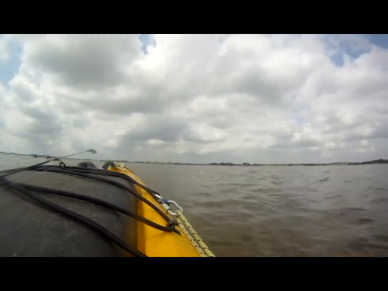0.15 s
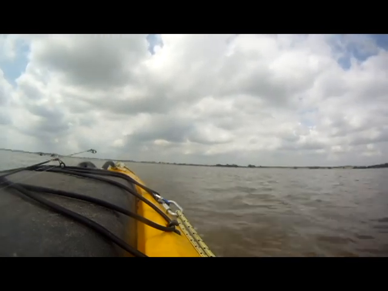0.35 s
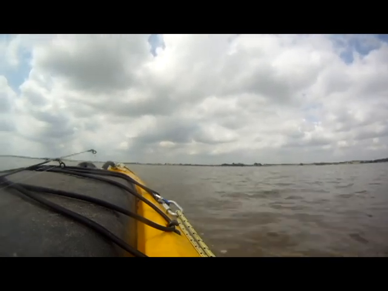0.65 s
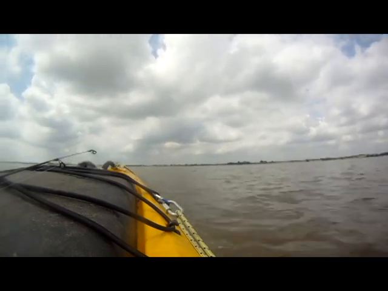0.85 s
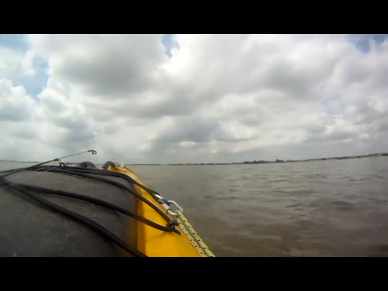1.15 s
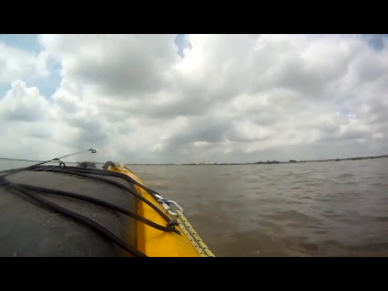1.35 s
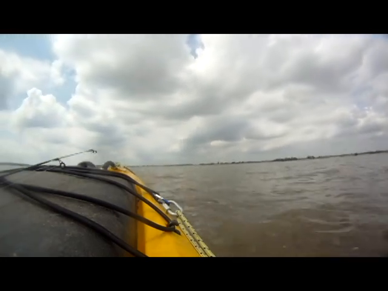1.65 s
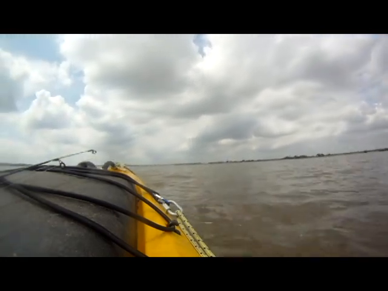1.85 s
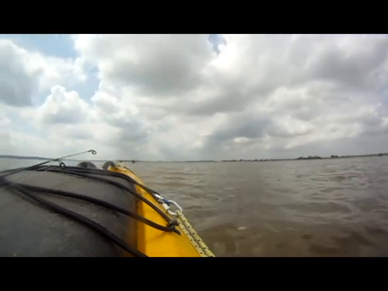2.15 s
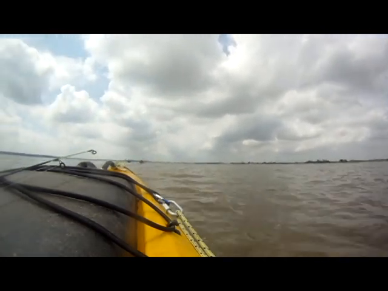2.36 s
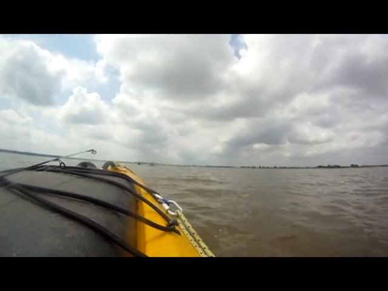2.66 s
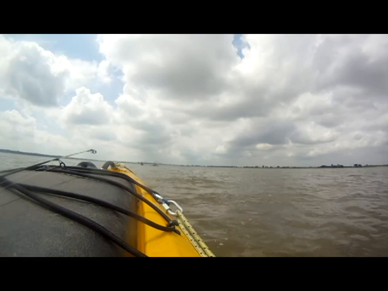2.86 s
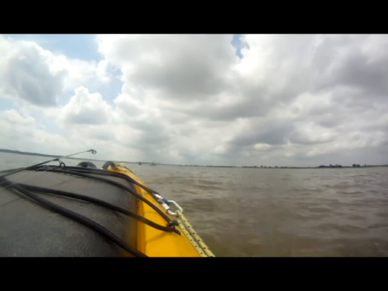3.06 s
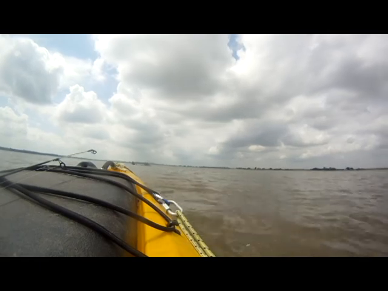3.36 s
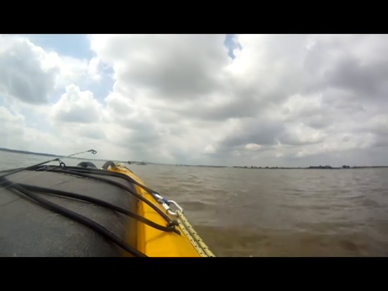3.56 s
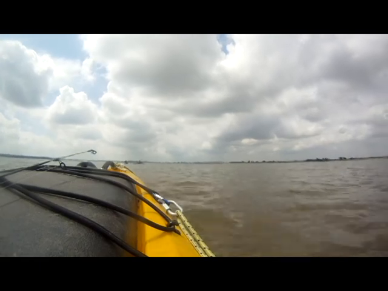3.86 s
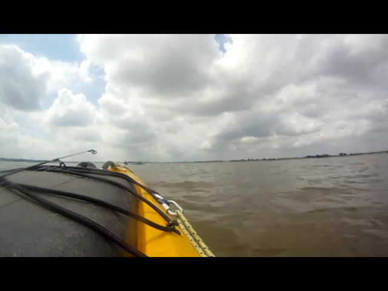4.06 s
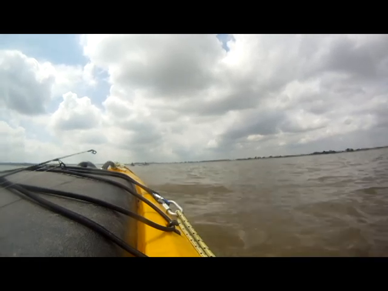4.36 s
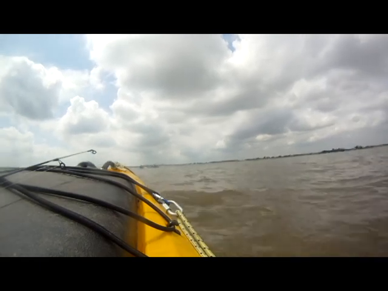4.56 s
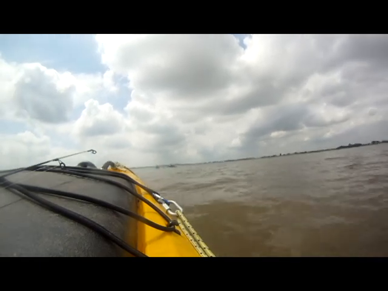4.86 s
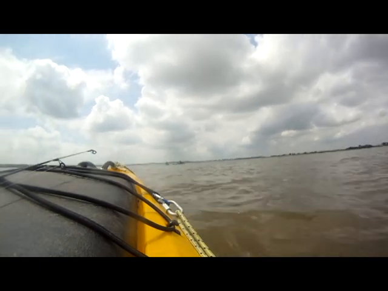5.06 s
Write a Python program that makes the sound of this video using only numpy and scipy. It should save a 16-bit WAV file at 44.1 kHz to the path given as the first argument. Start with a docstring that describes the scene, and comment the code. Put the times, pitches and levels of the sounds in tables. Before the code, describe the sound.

Close on a kayak deck on open water, small waves slap the hollow plastic hull at irregular intervals. Light plops lead to a strong splash just after one second with a deep soft boom, then more bubbly slaps around 1.6, 2, 3 and 5 seconds. Drops tick on the shell; low hollow gulps and faint wind rumble lie beneath. Mono, slightly gritty, glassy treble.

```python
"""On a lake, choppy water slaps the plastic hull of a kayak, heard from its deck.
Wavelets break into swarms of ringing bubbles; larger air pockets plop and drops crack on the shell.
Gulps of sinking pitch ring the air in the hollow hull, and one big wave adds a deep boom.
Foam and lapping noise, wind rumble and a hull drone lie underneath, all in filtered noise and bubbles.
Coarse sample-and-hold adds a glassy sheen."""
import sys
import numpy as np
from scipy import signal
from scipy.fft import rfft, irfft, next_fast_len
from scipy.io import wavfile
from scipy.ndimage import uniform_filter1d, map_coordinates

SR = 44100
rng = np.random.default_rng(int(sys.argv[2]) if len(sys.argv) > 2 else 0)


def int16_out(signal):
    """Quantize to a 16-bit WAV file."""
    q = np.round(np.clip(np.atleast_2d(signal).T, -1, 1) * 32767)
    wavfile.write(sys.argv[1], SR, q.astype(np.int16))


N = 229099

# coarse water spectrum, relative: f/Hz, density level/dB
SLOSH_SPECTRUM = [(250, -24), (520, -30), (790, -3.5), (950, -5.5), (1130, -2), (1380, -17.5), (1630, -6),
                  (2290, -7), (2550, -18.5), (2850, -13.5), (3250, -32), (3680, -27), (4300, -25.5),
                  (5800, -43)]
# larger air pockets closing on the hull: t/s, crest level/dB, nominal f/Hz
AIR_POCKETS = [(0.08, -28, 1670), (0.204, -25.5, 994), (0.226, -29.5, 1110), (0.254, -15.5, 1647),
               (0.304, -18, 1800), (0.331, -25, 1690), (0.339, -21, 1133), (0.427, -17, 2120),
               (0.505, -30.0, 1140), (0.65, -21.5, 1106), (0.721, -28.5, 1634), (0.773, -22.5, 1113),
               (1.109, -20.5, 2380), (1.191, -8.5, 1680), (1.197, -6.5, 1440), (1.207, -9.5, 1057),
               (1.223, -13.5, 870), (1.241, -20.5, 1200), (1.253, -19.5, 1120), (1.273, -24, 1530),
               (1.542, -18, 2280), (1.564, -11, 2145), (1.594, -16, 1600), (1.621, -19, 1750),
               (1.649, -9.5, 1125), (1.689, -17, 1860), (1.734, -26, 1110), (1.756, -30, 2014),
               (1.832, -28, 1030), (2.018, -9.5, 1774), (2.031, -12, 924), (2.073, -5, 1084),
               (2.099, -20.0, 1600), (2.297, -24.5, 1454), (2.353, -20.5, 1054), (2.367, -19.5, 2340),
               (2.496, -29.0, 1500), (2.526, -31.0, 1870), (2.555, -25, 1760), (2.587, -11, 1027),
               (2.608, -20, 1034), (2.632, -19.5, 950), (2.654, -25, 1190), (2.686, -15, 2325),
               (2.723, -23, 1675), (2.861, -35.5, 1700), (2.904, -36.5, 1064), (2.989, -8, 1150),
               (3.028, -20, 1180), (3.118, -30.5, 1670), (3.16, -28.5, 1097), (3.196, -30, 1600),
               (3.38, -27.5, 692), (3.52, -32.5, 1600), (3.581, -23.5, 1720), (3.598, -15, 1690),
               (3.611, -18, 1420), (3.64, -18, 833), (3.661, -14.5, 930), (3.697, -29, 1054),
               (3.747, -26.5, 1040), (3.793, -23, 1510), (3.963, -27.5, 2260), (4.152, -16.0, 1580),
               (4.174, -22.5, 828), (4.198, -16.5, 1610), (4.224, -20.5, 2120), (4.252, -31.5, 2350),
               (4.266, -22, 2350), (4.29, -30.5, 1670), (4.376, -26, 1170), (4.396, -34.5, 792),
               (4.475, -43, 1010), (4.508, -20, 1310), (4.67, -24, 1950), (4.694, -24, 947),
               (4.726, -19, 860), (4.83, -24, 2126), (4.871, -27, 2270), (4.892, -29.5, 1660),
               (4.96, -15.5, 1126), (4.981, -4, 1206), (5.034, -15.5, 1030), (5.049, -20.5, 1340)]
SMACK_GAIN, SMACK_REF_HZ = 1.5, 1300  # gain for a pocket of the reference pitch


def plops():
    """A pocket smacks shut, rings and sheds a smaller one; high ones smack more, loud ones die sooner."""
    track = np.zeros(N)
    t = np.arange(SR // 8) / SR
    draws = rng.random((len(AIR_POCKETS), 3))
    for (s, db, hz), (lag, ratio, life) in zip(AIR_POCKETS, draws):
        t60 = 0.019 * amp(-.3 * db) * (0.5 + life / 2)
        main = peaked(bubble(t, hz * .955, t60, rise=.33, attack=.0018))
        child_t = t - .002 - .007 * lag
        child = .45 * bubble(child_t, hz * (1.1 + .7 * ratio), t60 / 2, rise=.2, attack=.0008)
        smack_env = amp(-60 * t / 0.032) * (1 - np.exp(-t / 0.0003))
        smack = SMACK_GAIN * (hz / SMACK_REF_HZ) * rng.standard_normal(len(t)) * smack_env
        contact = coloured(main + child + smack, SLOSH_SPECTRUM)
        add(track, s - .0014, amp(db) * crested(shell(contact, t60=0.05, wet=0.5)))
    return track


# fine spray spectrum, relative: f/Hz, density level/dB
SPRAY_SPECTRUM = [(1200, -12), (2850, -1), (3250, -11), (3680, 3.5), (4250, -25), (5200, -7.5), (5900, -27)]
# hull drone spectrum, relative: f/Hz, density level/dB
DRONE_SPECTRUM = [(50, -8.5), (110, -7.5), (160, 0), (270, -6), (350, -16), (900, -32)]
# wavelets breaking on the hull: t/s, hold/s, slosh level/dB, spray level/dB
WAVELETS = [(0.295, 0.054, -33.5, -45.5), (0.418, 0.0081, -30, -35), (0.754, 0.12, -41, -48.5),
            (1.177, 0.088, -22.5, -35.5), (1.552, 0.15, -27, -36.5), (2.02, 0.071, -28.5, -40),
            (2.601, 0.1, -31, -34.5), (3.016, 0.21, -44.5, -56), (3.566, 0.095, -33, -41.5),
            (3.7, 0.028, -37.5, -45.5), (4.15, 0.16, -42, -49), (5.004, 0.049, -26, -33.5)]


def splashes():
    """Each wavelet breaks in uneven spurts into coarse bubbles and fine spray, and drums on the hull."""
    slosh, spray = np.zeros(N), np.zeros(N)
    t = np.arange(SR) / SR
    for s, hold_s, slosh_db, spray_db in WAVELETS:
        swell = (1 - np.exp(-t / 0.00094)) * amp(-60 * np.maximum(t - hold_s, 0) / 0.11)
        add(slosh, s, swell * amp(slosh_db))
        add(spray, s, swell * amp(spray_db))
    spurts = amp(3.6 * wobble(160))
    coarse = swarm(SLOSH_SPECTRUM, count=5500, top_hz=4200, cycles=20, spread_db=15, foam=0.28)
    fine = swarm(SPRAY_SPECTRUM, count=9000, top_hz=5510, cycles=35, spread_db=22, foam=0.27)
    late_slosh = np.roll(slosh, SR // 40)  # 25 ms
    drumming = amp(-8.0) * late_slosh * rush(DRONE_SPECTRUM)
    return spurts * (slosh * coarse + spray * fine) + drumming


# drops landing on the shell: t/s, peak level/dB, initial f/Hz
SHELL_DROPS = [(0.331, -21, 2550), (0.7713, -16, 3540), (0.784, -21, 3600), (1.656, -16, 3700),
               (1.8894, -28.5, 2800), (1.953, -34.5, 4770), (2.365, -21, 2910), (2.655, -22.5, 4730),
               (2.9717, -15.5, 3740), (3.226, -20, 2280), (3.3963, -22, 2790), (3.5724, -21, 3490),
               (3.6122, -21.5, 5290), (3.764, -17.5, 2790), (4.146, -16, 2720), (4.208, -27, 2680),
               (4.71, -23.5, 2900), (4.764, -35, 5000), (5.017, -14.5, 3690)]


def drops():
    """A drop cracks on the shell and traps one tiny bubble, which rings."""
    track = np.zeros(N)
    t = np.arange(SR // 12) / SR
    for s, db, hz in SHELL_DROPS:
        ping = bubble(t, hz, t60=0.018, rise=0.05, attack=0.00016)
        crack = unit(coloured(rng.standard_normal(len(t)), SPRAY_SPECTRUM)) * amp(-60 * t / 0.0091)
        add(track, s, amp(db) * shell(ping + 0.68 * crack, t60=0.025, wet=1.0))
    return track


# waves gulping under the hollow hull: t/s, gulp peak level/dB, rocking rumble level/dB
GULPS = [(0.004, -31.5, -43.5), (0.285, -26, -51), (0.988, -34, -48), (1.227, -23, -41),
         (1.417, -28.5, -35), (1.542, -24, -50), (2.032, -26, -33.5), (2.7, -37, -57), (3.442, -23.5, -40),
         (4.353, -29.5, -47), (4.441, -25.5, -67), (4.515, -28, -37), (4.581, -26, -52), (4.64, -19.5, -56),
         (4.669, -32.5, -61), (4.815, -26, -38.5), (4.98, -26.5, -43)]
# modes of the air in the hull: nominal f/Hz, nominal level/dB, t60/s
HULL_MODES = [(117.6, -17.5, 0.27), (162.2, -8.5, 0.21), (243, -21, 0.31)]
# nominal final pitch, extra share at the start, time constant of the fall
GULP_END_HZ, GULP_GLIDE, GULP_SINK_S = 195, .35, .009


def hull():
    """A wave gulps: a short note sinks in pitch, gurgles and leaves the air in the hull ringing."""
    track = np.zeros(N)
    t = np.arange(SR // 3) / SR
    hz, mode_db, t60 = np.transpose(HULL_MODES)[:, :, None]
    for s, db, _ in GULPS:
        # the waterline differs from gulp to gulp and shifts the pitches
        strength_db, detune = rng.normal(0, [2, .07], (len(HULL_MODES), 2)).T[:, :, None]
        pitch_hz = GULP_END_HZ * (1 + detune[0]) * (1 + GULP_GLIDE * np.exp(-t / GULP_SINK_S))
        gulp_env = amp(-60 * t / .045) * (1 - np.exp(-t / .0025))
        gulp = np.sin(2 * np.pi * np.cumsum(pitch_hz) / SR) * gulp_env
        gurgle_noise = unit(coloured(rng.standard_normal(len(t)), DRONE_SPECTRUM))
        gurgle = gurgle_noise * amp(-60 * t / 0.17) / 10
        mode_env = amp(mode_db + strength_db - 60 * t / t60)
        ring = np.sum(mode_env * np.sin(2 * np.pi * hz * (1 + detune) * t), axis=0)
        onset = 1 - np.exp(-t / GULP_SINK_S)
        add(track, s, amp(db) * peaked(gulp + (ring + gurgle) * onset))
    return track


# boom of the biggest wave: t/s, envelope peak level/dB, f/Hz, swell time constant/s
BOOM = (1.21, -28, 31, .055)


def heave():
    """The weight of the biggest wave shudders the boat: a deep boom swells slowly and fades."""
    s, db, hz, swell_s = BOOM
    t = np.maximum(np.arange(N) / SR - s, 0)
    swell = peaked(t ** 2 * np.exp(-t / swell_s))
    return amp(db) * swell * np.sin(2 * np.pi * hz * t + wobble(43) / 2)


# fine hiss of foam on the open water: t/s, level/dB
FOAM_LEVEL = [(0, -80.5), (3.35, -68.5), (3.95, -55), (4.4, -57), (5.19, -57.5)]
CHOP_DB, CHOP_DB_PER_FOAM_DB = -19, 0.42  # open-water lapping: level at 0 dB of foam, slope
LAP_RE_SLOSH_DB, LAP_RISE_DB_PER_S, LAP_FALL_DB_PER_S = -15, 101, 169


def ripples():
    """Low bubbling and a faint trickle cluster around wavelets, over the noise wash of open water."""
    foam_s, foam_point_db = np.transpose(FOAM_LEVEL)
    foam_db = np.interp(np.arange(N) / SR, foam_s, foam_point_db)
    chop = amp(CHOP_DB + CHOP_DB_PER_FOAM_DB * foam_db)
    stirred = [amp(slosh_db + LAP_RE_SLOSH_DB) * surge(s, hold_s, LAP_RISE_DB_PER_S, LAP_FALL_DB_PER_S)
               for s, hold_s, slosh_db, _ in WAVELETS]
    clusters = amp(3.5 * wobble(40))
    level = np.linalg.norm([chop, *stirred], axis=0) * clusters  # power sum
    bubbling = swarm(SLOSH_SPECTRUM, count=2000, top_hz=2400, cycles=24, spread_db=24, foam=0.3)
    trickle = swarm(SPRAY_SPECTRUM, count=700, top_hz=5600, cycles=3, spread_db=26, foam=0.1)
    wash = amp(-58.5) * rush(SLOSH_SPECTRUM) + amp(foam_db) * rush(SPRAY_SPECTRUM)
    lapping = unit(shell(bubbling, t60=0.023, wet=0.86)) + amp(-13) * trickle
    return level * lapping + wash


# wind rumble spectrum, relative: f/Hz, density level/dB
WIND_SPECTRUM = [(12, -21.5), (31, -2), (60, -11), (250, -28), (600, -66)]
WIND_DB, GUST_DB, GUST_KNOTS_PER_S = -52.5, -1.5, 3.4  # centre, scale and pace of random gusts
ROCK_RISE_DB_PER_S, ROCK_FALL_DB_PER_S = 398, 98


def rumble():
    """Wind and each knocking wave shake the boat as low noise; the hull drones along."""
    rocking = [amp(rock_db) * surge(s, 0, ROCK_RISE_DB_PER_S, ROCK_FALL_DB_PER_S)
               for s, _, rock_db in GULPS]
    wind = amp(WIND_DB + GUST_DB * wobble(GUST_KNOTS_PER_S))
    rumble_db = 20 * np.log10(wind + sum(rocking))
    drone = unit(amp(2.8 * wobble(22)) * rush(DRONE_SPECTRUM))
    return amp(rumble_db) * rush(WIND_SPECTRUM) + amp(0.64 * rumble_db - 19) * drone


def bubble(t, hz, t60, rise, attack):
    """A ringing air pocket; its pitch climbs by the share rise per t60 as it nears the surface."""
    t = np.maximum(t, 0)
    tone = np.sin(2 * np.pi * hz * t * (1 + rise * t / t60 / 2))
    return tone * amp(-60 * t / t60) * (1 - np.exp(-(t / attack) ** 2))


def swarm(spectrum, count, top_hz, cycles, spread_db, foam):
    """Many small bubbles of random size and strength over a little foam noise, rms 1."""
    when, size, strength = rng.random((count, 3)).T[:, :, None]
    hz = 600 * (top_hz / 600) ** size
    rise = (600 / hz) ** 2 / 2 + .1  # large bubbles glide most
    k = np.arange(SR // 40)
    # small bubbles die sooner, so they start stronger
    strength_gain = hz * amp(spread_db * strength)
    grains = strength_gain * bubble(k / SR, hz, cycles / hz, rise, attack=1 / hz)
    index = (when * N).astype(int) + k
    track = np.bincount(index.ravel(), grains.ravel(), N)[:N]
    return unit(unit(coloured(track, spectrum)) + foam * rush(spectrum))


def shell(x, t60, wet):
    """The shell rings briefly, differently at each spot; small contacts radiate no bass. Peak 1."""
    t = np.arange(SR // 8) / SR
    tail = rng.standard_normal(len(t)) * amp(-60 * t / t60)
    sound = unit(x) + wet * unit(signal.fftconvolve(x, tail)[:len(x)])
    bass_cut = signal.butter(3, 620, "highpass", fs=SR, output="sos")
    return peaked(signal.sosfilt(bass_cut, sound))


def surge(s, hold_s, rise_db_per_s, fall_db_per_s):
    """Gain of a passing wave: builds up to 1 at time s, holds and ebbs."""
    t = np.arange(N) / SR - s
    return amp(-rise_db_per_s * np.maximum(-t, 0) - fall_db_per_s * np.maximum(t - hold_s, 0))


def rush(spectrum):
    """Coloured noise of rms 1."""
    return unit(coloured(rng.standard_normal(N), spectrum))


def coloured(x, spectrum):
    """x through a causal minimum-phase filter, level interpolated over log f."""
    m = 2 * next_fast_len(len(x) // 2 + 4096)
    hz, db = np.transpose(spectrum)
    log_f = np.log(np.fft.rfftfreq(m, 1 / SR) + 1)
    gain = amp(np.interp(log_f, np.log(hz), db))
    cepstrum = irfft(np.log(gain))
    cepstrum[1:m // 2] *= 2
    cepstrum[m // 2 + 1:] = 0
    return irfft(rfft(x, m) * np.exp(rfft(cepstrum)), m)[:len(x)]


def wobble(knots_per_s):
    """A smooth random curve through normal-distributed knots."""
    knots = rng.standard_normal(int(N * knots_per_s / SR) + 4)
    return map_coordinates(knots, [np.arange(N) * knots_per_s / SR])


def amp(db):
    """Amplitude gain of a level in dB."""
    return 10 ** (np.asarray(db) / 20)


def unit(x):
    """x at rms 1."""
    return x / np.sqrt(np.mean(x ** 2) + 1e-20)


def peaked(x):
    """x at peak 1."""
    return x / np.max(np.abs(x))


def crested(x):
    """x scaled so that its loudest 5 ms have the rms of a sine of height 1."""
    return x / np.sqrt(2 * np.max(uniform_filter1d(x ** 2, size=SR // 200)))


def add(track, s, sound):
    """Mix a sound into a track at time s."""
    start = max(round(s * SR), 0)
    part = track[start:start + len(sound)]
    part += sound[:len(part)]


def scene():
    """Sum of all sources, one channel."""
    water = plops() + splashes() + drops() + ripples()
    boat = hull() + heave() + rumble()
    return (water + boat)[None]


SAMPLER_HZ, TOP_HZ = 12000, 15500


def record(dry):
    """Peaks are rounded off; holding each coarse sample mirrors the sound into the treble."""
    rounded = dry / (1 + (dry / .85) ** 6) ** (1 / 6)
    coarse = signal.resample_poly(rounded, SAMPLER_HZ, SR, axis=1)
    steps = np.repeat(coarse, 4, axis=1)
    held = signal.resample_poly(steps, SR, 4 * SAMPLER_HZ, axis=1)[:, :N]
    return signal.sosfilt(signal.cheby1(12, .1, TOP_HZ, fs=SR, output="sos"), held)


dry = scene()
out = record(dry)
int16_out(out)
```